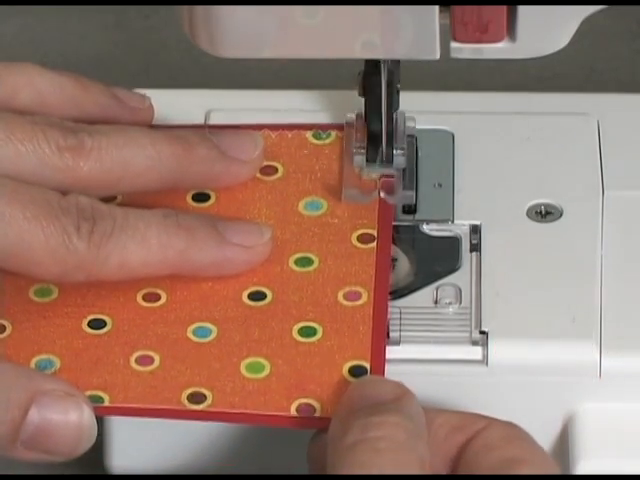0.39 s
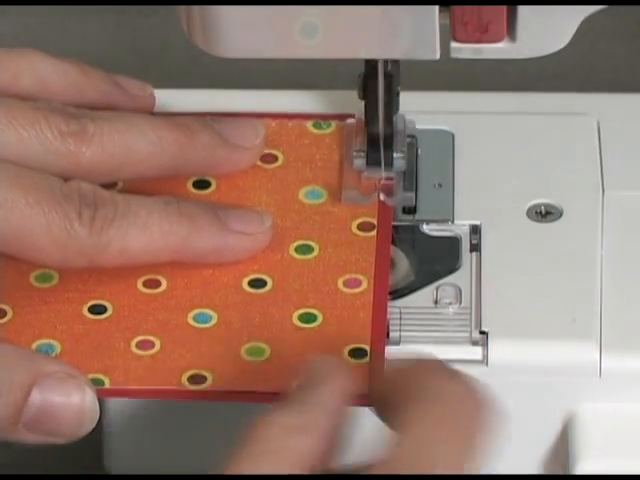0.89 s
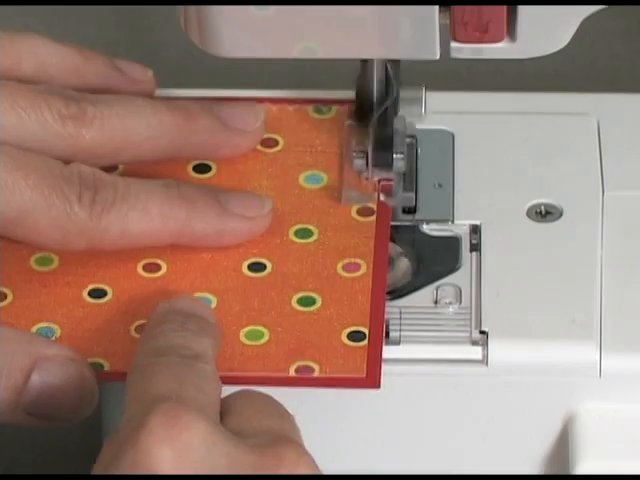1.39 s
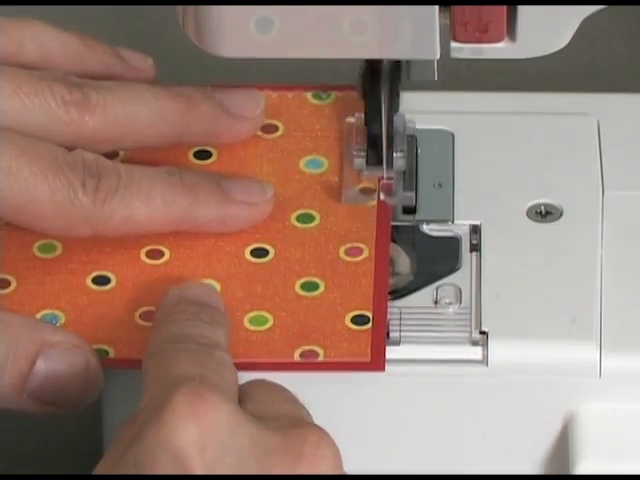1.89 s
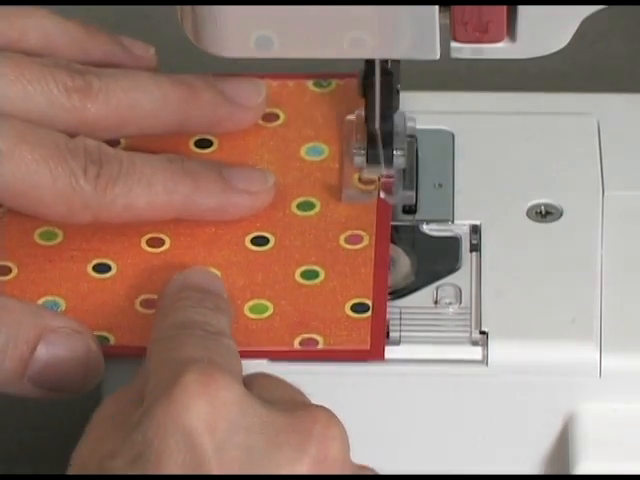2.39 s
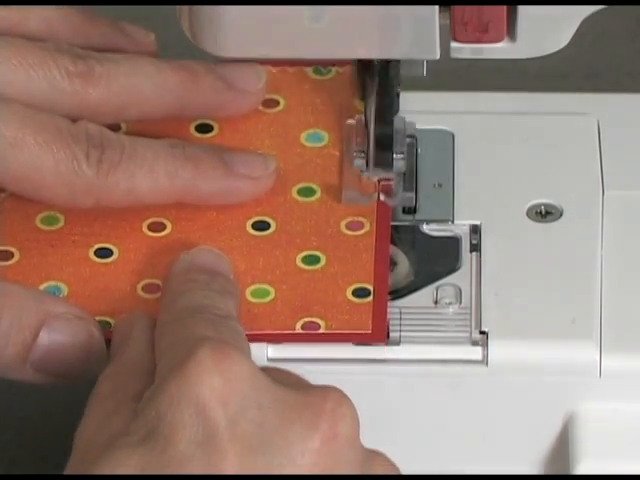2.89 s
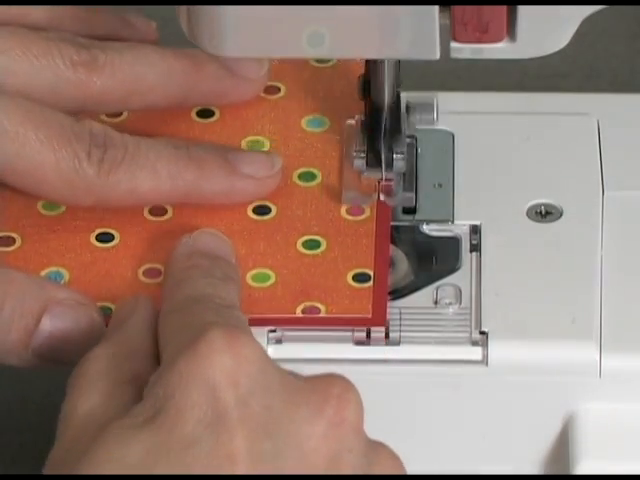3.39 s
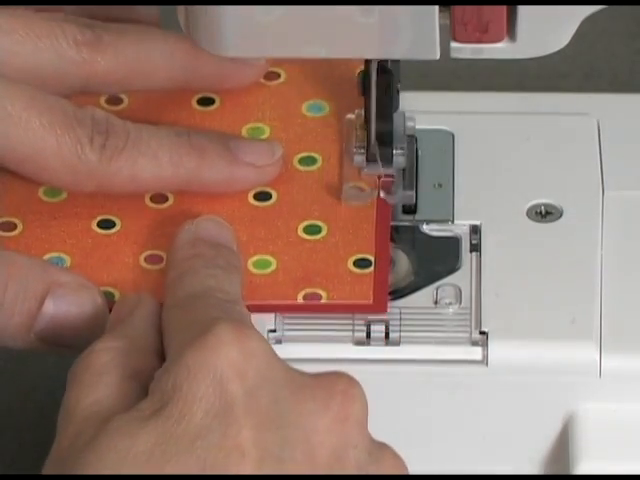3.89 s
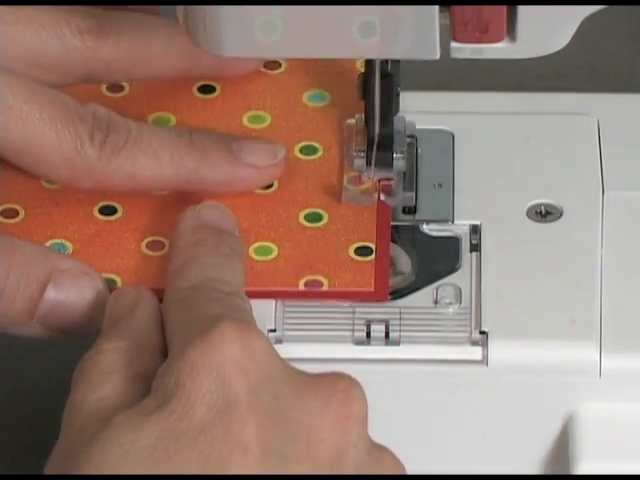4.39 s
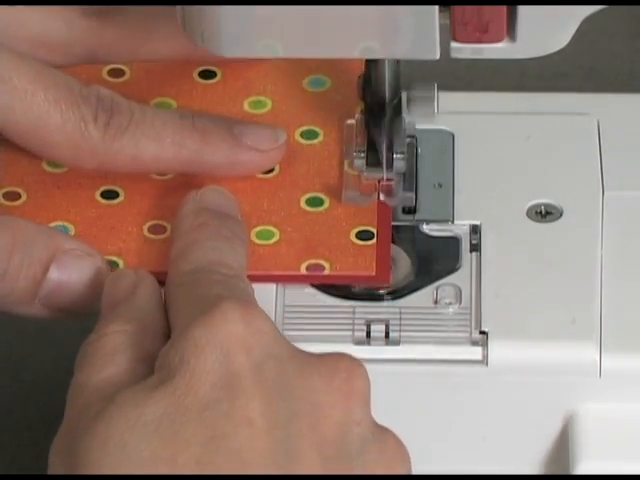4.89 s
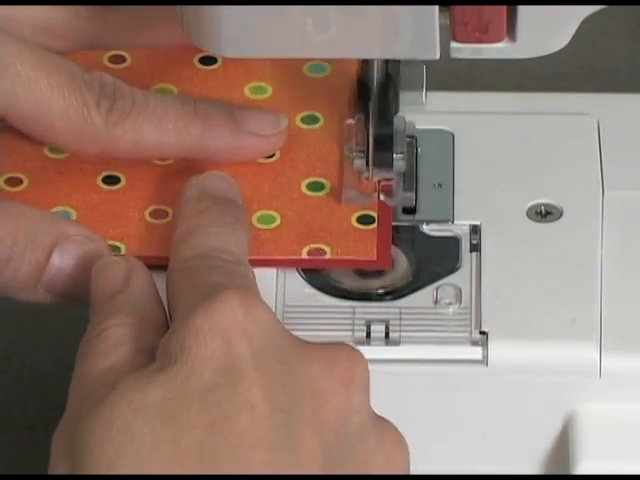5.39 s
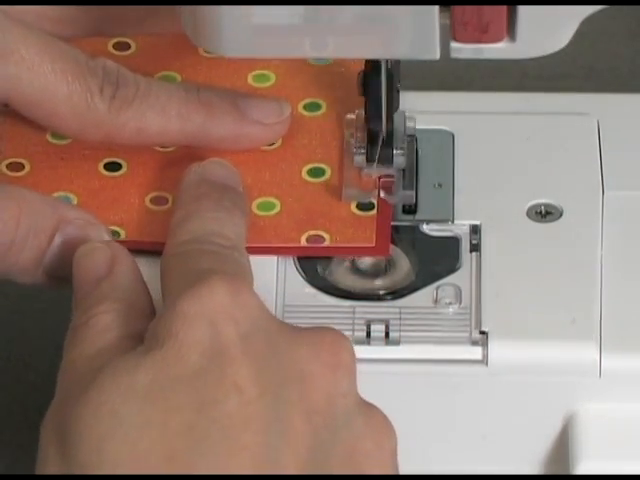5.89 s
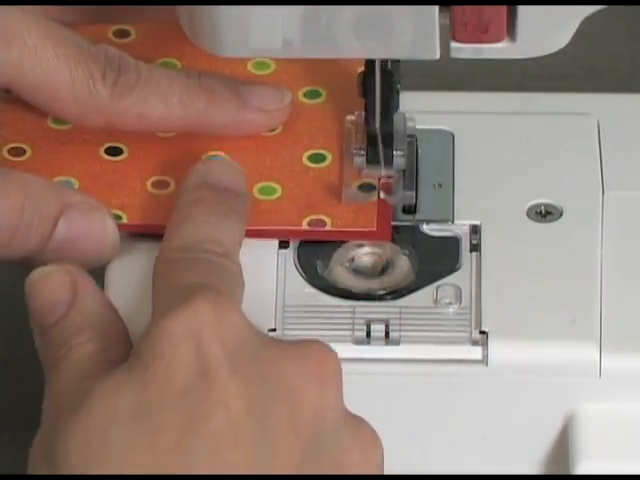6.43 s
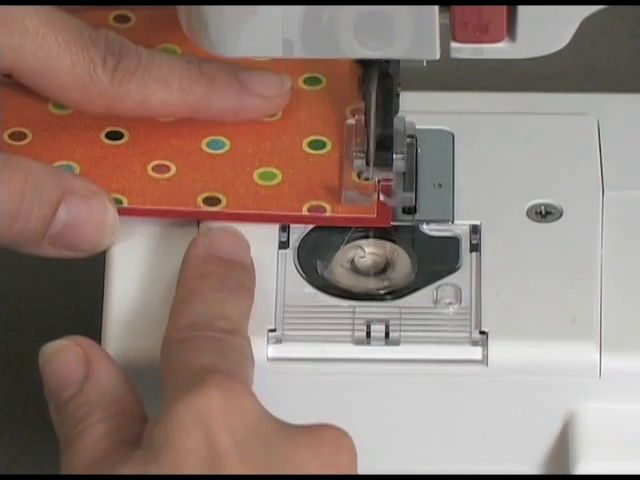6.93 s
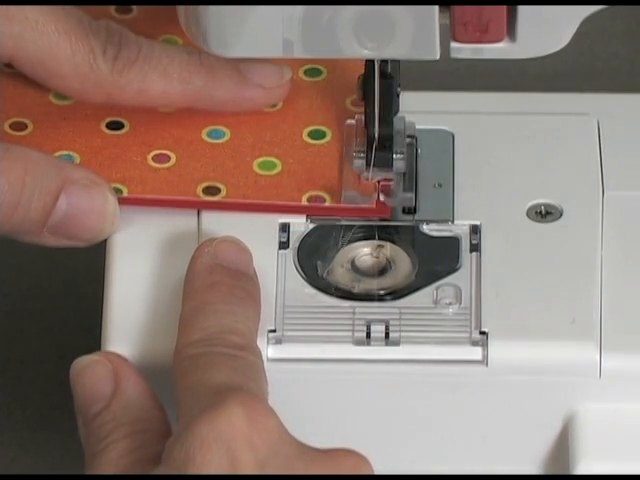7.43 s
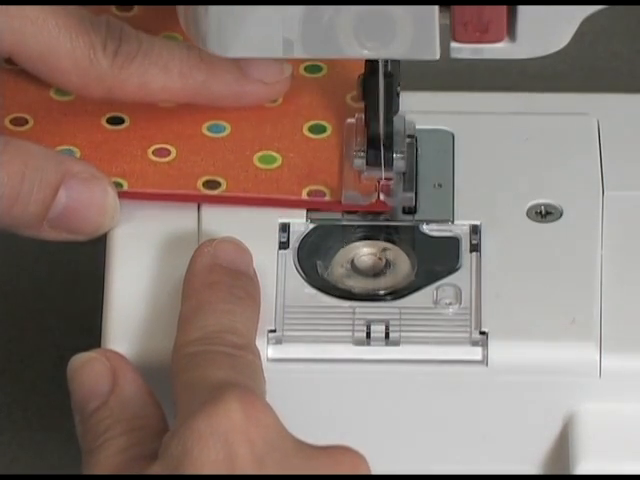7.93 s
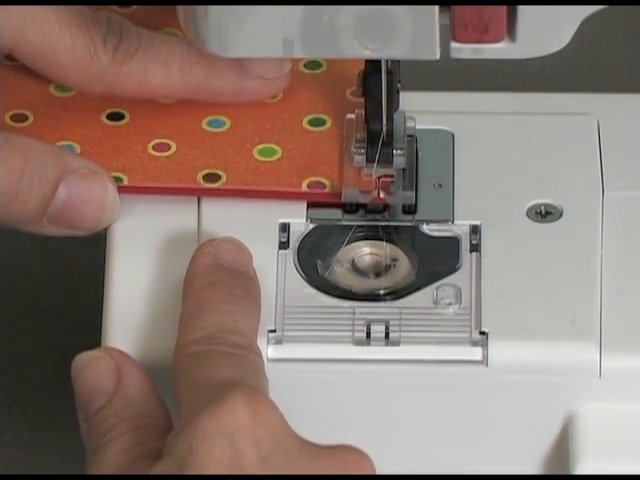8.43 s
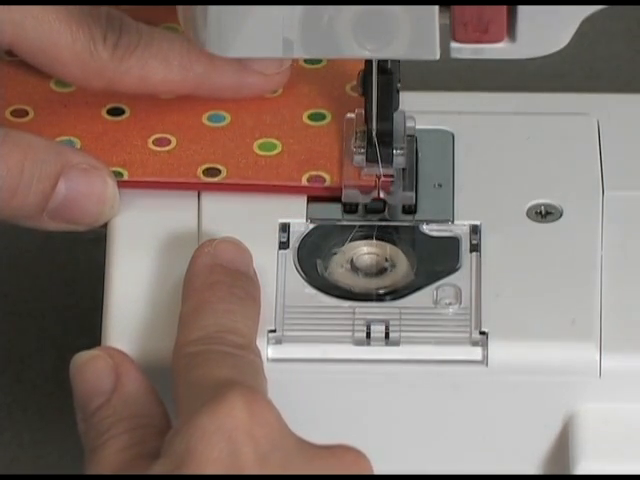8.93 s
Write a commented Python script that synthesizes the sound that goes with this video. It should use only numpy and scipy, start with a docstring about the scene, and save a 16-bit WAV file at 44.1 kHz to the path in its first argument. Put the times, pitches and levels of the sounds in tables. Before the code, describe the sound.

A small sewing machine on a table stitches through card at an unhurried, even pace, heard close in a small room. Uneven metallic clacks, light table thumps and loose-part rattles ride on a humming, whirring drive whose pitch wavers each turn. It runs down with a knock, leaving a faint low room hum, then the motor gives two short bursts, the second briefer, and goes quiet.

```python
"""Small sewing machine on a table

It stitches a zigzag through card, stops, and gives two short bursts in a faintly humming room.
One cam turn covers two stitches: blows at fixed shaft angles ring table, frame, shell and steel parts.
A toothed drive hums on the shaft angle; gears whir as noise gated by the tooth mesh."""
import sys
import numpy as np
from scipy import signal
from scipy.fft import rfft, irfft, next_fast_len
from scipy.io import wavfile
from scipy.ndimage import uniform_filter1d

SR = 44100
rng = np.random.default_rng(int(sys.argv[2]) if len(sys.argv) > 2 else 0)


def generate_wav(sig):
    """Save sig (samples, or channels by samples) to the path in sys.argv[1] as 16-bit PCM at SR."""
    pcm = np.round(np.clip(np.atleast_2d(sig).T, -1, 1) * 32767).astype(np.int16)
    wavfile.write(sys.argv[1], SR, pcm)


def undo_db(level):
    """Turn decibels back into plain size, where 20 dB means ten times bigger."""
    steps = np.asarray(level, float) / 20
    return 10 ** steps


N = 399105
DRIVE_TEETH = 83

# low modes of the table: mode_hz, level_db, t60_s
TABLE_MODES = [(48.7, -25.5, 0.083), (70, -13, .09), (89, -8.5, 0.23), (126, -2, 0.094), (133.7, -5, 0.18)]
# low modes of the frame: mode_hz, level_db, t60_s
FRAME_MODES = [(196, -23.5, 0.13), (255.8, 3.5, 0.23), (300, 4.5, 0.073), (325.5, 2, 0.11),
               (407.5, 1, 0.087)]
# ringing bands, shell then four of steel:
# low_hz, high_hz, rattle_t60_s, tail_db, whir_db, share repeating each turn (0-1)
RING_BANDS = [(418, 2930, 0.043, -11, -0.74, 0.55), (2200, 4100, 0.026, -10, -17, 0.02),
              (4090, 6900, 0.021, -15.5, -16, 0), (6550, 8700, 0.023, -18.5, -32.5, 0.07),
              (9000, 18000, 0.02, -16.5, -27, .05)]


def evened(x):
    """Scales to rms 1."""
    return x / np.sqrt(np.mean(x ** 2) + 1e-20)


def read(points, hz):
    """Reads a spectrum on a log-frequency axis."""
    f, value = np.transpose(points)
    return np.interp(np.log(hz + 1), np.log(f + 1), value)


def shaped(x, gain):
    """Filters by a gain given as a function of frequency."""
    size = next_fast_len(N + 4096)
    bins_hz = np.arange(size // 2 + 1) * SR / size
    return irfft(rfft(x, size) * gain(bins_hz), size)[:N]


def ring(train, modes, rise_s=1e-5):
    """Every click starts the same dying sines."""
    t = np.arange(SR // 3) / SR
    sound = sum(undo_db(db - 60 * t / t60_s) * np.sin(2 * np.pi * hz * t) for hz, db, t60_s in modes)
    return signal.oaconvolve(train, sound * (1 - np.exp(-t / rise_s)))[:N]


def strike(angle, at, level_db, soft_db):
    """Click trains, one per column of level_db: a click where the shaft passes an angle."""
    heard = (at > angle[0]) & (at < angle[-1])
    where = np.searchsorted(angle, at[heard])
    trains = np.zeros((level_db.shape[-1], N))
    np.add.at(trains.T, where, undo_db(level_db[heard] + soft_db[where][:, None]))
    return trains


def motion():
    """Shaft angle in turns, and drive level in dB below full as the pedal switches power."""
    # cam position, even running, coasting, rest and two more starts: time_s, angle_turns
    shaft = [(-0.0874, 0), (1.022, 3), (2.1358, 6), (3.6103, 10), (4.7122, 13), (6.1777, 17), (7.27, 20),
             (7.303, 20.08), (7.354, 20.165), (7.381, 20.195), (7.5, 20.27), (7.69, 20.27), (7.78, 20.34),
             (7.848, 20.463), (7.95, 20.698), (8.049, 20.957), (8.096, 21.08), (8.132, 21.165),
             (8.152, 21.195), (8.3, 21.3), (8.585, 21.3), (8.666, 21.44), (8.708, 21.51), (8.745, 21.578),
             (8.835, 21.78), (8.873, 21.83), (8.961, 21.9), (9.06, 21.93)]
    # pedal presses: power_on_s, full_drive_s, power_off_s, gears_halt_s
    runs = [(-0.6, -0.3, 7.292, 7.42), (7.694, 7.856, 8.1, 8.245), (8.578, 8.72, 8.76, 8.972)]
    kick_db, kick_s = -11, 0.019  # the motor jumps to this level on power
    coast_db_per_s, halt_db_per_s = 89, 198
    t = np.arange(N) / SR
    levels_db = []
    for on, full, off, halt in runs:
        start_db = np.interp(t, [on, on + kick_s, max(full, on + 2 * kick_s)], [-60, kick_db, 0])
        coast_db = coast_db_per_s * np.clip(t - off, 0, halt - off)
        halt_db = halt_db_per_s * np.maximum(t - halt, 0)
        levels_db.append(start_db - coast_db - halt_db)
    return np.interp(t, *np.transpose(shaft)), np.max(levels_db, axis=0)


def room():
    """Shaped air noise and a few steady tones."""
    # spectrum of the air noise, relative: freq_hz, level_db_per_hz
    air_spectrum = [(18, -30), (30, 1), (96, 12), (142, -1), (257, 2.5), (392, -17), (514, -11.5),
                    (642, -20.5), (1490, -19), (2690, -31.5), (11000, -39.5), (14300, -72), (22000, -120)]
    air_rms_db = -42.5
    # steady tones: pitch_hz, rms_db
    tones = [(258.4, -54), (7940, -87), (11843, -71)]
    t = np.arange(N) / SR
    air = evened(shaped(rng.standard_normal(N), lambda hz: undo_db(read(air_spectrum, hz))))
    out = undo_db(air_rms_db) * air
    for hz, db in tones:
        out += np.sqrt(2) * undo_db(db) * np.sin(2 * np.pi * (hz * t + rng.random()))
    return out


def walls(x):
    """Sparse reflections of random sign, each band dying at its own speed."""
    # reverberation: freq_hz, t60_s
    decay_times = [(200, 0.5), (1000, 0.3), (4000, 0.12), (12000, 0.23)]
    level_db = -11.5
    taps = np.zeros(SR // 2)
    at = np.arange(300, len(taps) - 20, 20)
    taps[at + rng.integers(0, 20, len(at))] = rng.choice([-1., 1.], len(at))
    hz, t, z = signal.stft(taps, SR, nperseg=256)
    decay = undo_db(-60 * t / read(decay_times, hz)[:, None])
    tail = signal.istft(z * decay, SR, nperseg=256)[1]
    return undo_db(level_db) * signal.oaconvolve(x, tail / np.linalg.norm(tail))[:N]


def gear_rumble(whir_db):
    """The whir also shakes the low modes."""
    push = undo_db(whir_db - 36.5) * rng.standard_normal(N)
    return ring(push, FRAME_MODES) + undo_db(-15) * ring(push, TABLE_MODES)


def whistles(angle, drive_db):
    """A part slides on each stroke: narrow noise rides a gliding tone, fading in and out."""
    # thin whistles: from_turns, to_turns, start_hz, end_hz, level_db
    strokes = [(.17, .46, 11400, 11600, -55), (.5, .9, 10800, 10720, -54)]
    width_hz = 45
    out, r = np.zeros(N), np.exp(-np.pi * width_hz / SR)
    for start, end, start_hz, end_hz, db in strokes:
        along = np.clip((angle % 1 - start) / (end - start), 0, 1)
        fuzz = evened(signal.lfilter([1 - r], [1, -r], rng.standard_normal(N)))
        phase = 2 * np.pi * np.cumsum(start_hz + (end_hz - start_hz) * along) / SR
        fade = np.sqrt(2 * abs(np.sin(np.pi * along)))
        out += fade * undo_db(db + drive_db) * fuzz * np.sin(phase)
    return out


def hum(angle, drive_db):
    """Tooth after tooth: a clean tone that sags and swells with the load."""
    # load swing within a turn: angle_turns, hum_db, speed_change_percent
    load = [(0.0, 0.1, 0.7), (.031, -1, -1.13), (.075, 3.1, 0.3), (.13, 2.4, -3), (.19, 0.7, -1.85),
            (.225, -2.5, -3), (.34, -0.3, -0.16), (.375, -2, -1.36), (.445, 3.7, 1.5), (.5, 0.9, -1.81),
            (.56, 1.8, 1.3), (.625, -2.5, 2.5), (.69, 0.2, 0.77), (.75, 1.8, 2.5), (.82, -2.1, .4),
            (.88, 1.9, 1.67), (.94, 0, -1.63)]
    # overtones: multiple, level_db
    overtones = [(2, -21), (3, -18.5), (4, -40), (5, -31.5), (6, -24), (7, -21.5), (8, -35.5)]
    full_db, steepness = -15, 2.6  # the hum drops faster than the whir
    mute_hz = 193  # the frame is mute below its first resonance
    at, *swings = np.transpose(load)
    speed = uniform_filter1d(np.gradient(angle) * SR, size=SR // 25)
    load_db, percent = (uniform_filter1d(np.interp(angle, at, c, period=1), size=200) for c in swings)
    hz = DRIVE_TEETH * speed * (1 + percent / 100)
    phase = 2 * np.pi * np.cumsum(hz) / SR
    tone = np.sin(phase) + sum(undo_db(db) * np.sin(round(k) * phase) for k, db in overtones)
    radiated = 1 / np.sqrt(1 + (mute_hz / (hz + 1)) ** 16)
    return np.sqrt(2) * undo_db(full_db + steepness * drive_db + load_db) * radiated * tone


def blows(angle, soft_db):
    """Click trains for table, frame, shell and four steel bands, set by cam angle and drive slack."""
    # blows of one turn: angle_turns, frame_db, shell_db, steel_db, brightness_db_per_band
    cam = [(0.016, -26.5, -14.5, -38, -6), (0.074, -33, -15, -27.5, 3.5), (0.11, -31, -26.5, -44, -2),
           (0.161, -26, -16, -23, 0), (0.189, -22.5, -19.5, -28, -3.7), (0.229, -33.5, -26, -40.5, 7),
           (0.283, -40.5, -23, -31.5, 4.5), (0.335, -33.5, -23, -36.5, 3.5), (0.357, -30.5, -24, -29, 0),
           (0.411, -32.5, -28.5, -40.5, 3), (0.437, -36, -19.5, -40, 3), (0.46, -22.5, -14, -23.5, -.6),
           (0.485, -20, -19, -34.5, -.8), (0.504, -26, -11.5, -20.5, 0), (0.572, -24.5, -14.5, -30.5, 4),
           (0.649, -42, -15.5, -36.5, 2.5), (0.671, -42.5, -19.5, -33, -3.5),
           (0.73, -30, -20.5, -34.5, -1.1), (0.778, -38, -27, -33.5, 4.5), (0.831, -24.5, -19, -34.5, 2),
           (0.865, -44.5, -20, -29.5, 1), (0.9, -31, -19.5, -35.5, 1.5), (0.952, -21, -12, -16.5, 0),
           (0.981, -19.5, -15, -24.5, 1), (0.996, -44, -5, -15, 1.4)]
    # the mechanism's weight pushes the table: angle_turns, level_db
    thuds = [(0.11, -23), (0.227, -31), (0.283, -37.5), (0.504, -26.5), (0.65, -33), (0.73, -36),
             (0.778, -32), (0.952, -23), (0.997, -19.5)]
    # slack in the drive knocks as it stops and starts: time_s, table_db, shell_db, steel_db
    knocks = [(7.272, -30, -7.5, -22), (7.704, -45, -32.5, -51), (8.591, -48, -31, -50),
              (8.616, -40, -21, -49), (8.682, -20, -14, -16.5), (8.96, -41, -37, -45)]
    # answer of the four steel bands, low to high: level_db
    steel_answer = [-1.06, 0.3, -7, -14]
    scatter_db, steel_scatter_db = 1.87, 1.95  # loose steel takes each blow differently
    turns = np.arange(int(angle[-1]) + 1)

    at, frame_db, shell_db, steel_db, bright_db = np.transpose(cam)
    steel_db = steel_db[:, None] + steel_answer + np.outer(bright_db, np.arange(4) - 3 / 2)
    chance = rng.standard_normal((len(at), len(turns), 7))
    chance[..., 0] *= .3  # the heavy frame repeats closely
    level_db = np.column_stack([frame_db, shell_db, steel_db])[:, None] + scatter_db * chance[..., :6]
    level_db[..., 2:] += steel_scatter_db * chance[..., 6:]
    parts = strike(angle, np.add.outer(at, turns), level_db, soft_db)

    at, thud_db = np.transpose(thuds)
    thud_db = np.add.outer(thud_db, 0 * turns)[..., None]
    table = strike(angle, np.add.outer(at, turns), thud_db, soft_db)

    for s, table_db, shell_db, steel_db in knocks:
        table[0, round(s * SR)] += undo_db(table_db)
        parts[1:, round(s * SR)] += undo_db([shell_db, *np.add(steel_db, steel_answer)])
    return np.vstack([table, parts])


def pings(trains, whir_db):
    """Each blow strikes the steel parts unevenly and bounces once; loose parts chatter by chance."""
    # small steel parts: pitch_hz, level_db, t60_s
    metal = [(3150, -34, 0.04), (3860, -6, 0.035), (4470, -2, 0.018), (4970, -3.5, 0.022),
             (5290, -18, 0.0089), (7080, -3, 0.024), (7290, 0.5, 0.014), (7850, -0.5, 0.018),
             (9180, -3.5, 0.023), (11100, -4.5, 0.018)]
    # loose parts that chatter between the blows: pitch_hz
    loose = [4950, 5100, 5220, 5460]
    loose_per_s, loose_db = 29, -14.5  # for each loose part
    out = np.zeros(N)
    for hz, db, t60_s in metal:
        train = trains[np.searchsorted([hi for lo, hi, *rest in RING_BANDS[1:]], hz)]
        bounce = undo_db(-5.5) * np.roll(train, round(rng.uniform(.0015, 0.0035) * SR))
        uneven = undo_db(4.6 * rng.standard_normal(N))
        out += ring((train + bounce) * uneven, [(hz, db, t60_s)], rise_s=.0003)
    shake_db = whir_db + np.minimum(whir_db + 30, 0)  # a slow shaft hardly shakes them
    for hz in loose:
        size = undo_db(shake_db + loose_db + 3.6 * np.minimum(rng.exponential(1, N), 4))
        hits = rng.random(N) < loose_per_s / SR
        out += ring(size * hits, [(hz, 0, .02)], rise_s=0.00025)
    return out


def band(lo_hz, hi_hz):
    """One slice of the machine's colour, of unit power."""
    # shell and microphone: freq_hz, level_db_per_hz
    colour = [(150, -20.5), (250, -6), (277, 9), (307, -6.5), (625, -10.5), (909, -7), (1150, -14),
              (1300, -14.5), (1670, -16.5), (2230, -24), (4960, -31.5), (11200, -42), (13000, -47.5),
              (14500, -51.5)]
    # resonances above (or dips below) that colour: freq_hz, width_hz, level_db
    resonances = [(376, 58, 4.5), (705, 30, 4), (923, 210, 2.5), (1005, 44, 1.5), (1304, 76, 7.5),
                  (1453, 28, 6), (1706, 90, 4), (3280, 210, 3.5), (4530, 63, -7), (5030, 620, 1.5),
                  (7140, 180, -4), (7700, 200, -1.5), (9070, 160, 2), (1897, 140, 3.5)]

    def gain(hz):
        peaks_db = sum(db / (1 + (2 * (hz - f) / w) ** 2) for f, w, db in resonances)
        edges = (1 + (lo_hz / (hz + 1)) ** 8) * (1 + (hz / hi_hz) ** 8)
        return evened(undo_db(read(colour, hz) + peaks_db) / np.sqrt(edges))
    return gain


def rattle(angle, trains, whir_db):
    """Blows and meshing teeth gate a rough contact force that rings the shell and metal parts."""
    chatter_db, tail_t60_s = 1.5, 0.17  # uneven mesh; parts settling after a blow
    t, out = np.arange(SR // 3) / SR, np.zeros(N)
    wear = rng.standard_normal(16384)
    worn = wear[(angle % 1 * len(wear)).astype(int)]  # the same surfaces meet again each turn
    mesh = evened(1 + .22 * np.cos(2 * np.pi * DRIVE_TEETH * angle))
    chatter = evened(uniform_filter1d(rng.standard_normal(N), size=250))
    mesh *= evened(undo_db(chatter_db * chatter))
    for train, (lo, hi, t60_s, tail_db, own_db, same) in zip(trains, RING_BANDS):
        same = np.clip(same, 0, 1)
        force = np.sqrt(same) * worn + np.sqrt(1 - same) * rng.standard_normal(N)
        attack = (1 - np.exp(-t / 0.0014)) ** 2
        decay = undo_db(-60 * t / t60_s) * attack + undo_db(tail_db - 60 * t / tail_t60_s)
        blow_power = signal.oaconvolve(train ** 2, decay ** 2)[:N]
        # slow gears sound duller
        dull_db = 0.1 * np.log2(hi / 2200) * np.maximum(-15.5 - whir_db, 0)
        whir_power = (undo_db(own_db + whir_db - dull_db) * mesh) ** 2
        out += shaped(force * np.sqrt(abs(blow_power + whir_power)), band(lo, hi))
    return out


def scene():
    """The machine in its room."""
    angle, drive_db = motion()
    whir_db = -20 + drive_db
    soft_db = 1.32 * np.minimum(drive_db + 3, 0)  # a slow shaft strikes softly
    trains = blows(angle, soft_db)
    thumps = ring(trains[0], TABLE_MODES) + ring(trains[1], FRAME_MODES)
    clatter = rattle(angle, trains[2:], whir_db) + pings(trains[3:], whir_db) + whistles(angle, drive_db)
    clatter += walls(clatter)
    return (thumps + clatter + gear_rumble(whir_db) + hum(angle, drive_db) + room())[None]


def roll_off(x):
    """The treble ends steeply here."""
    return signal.sosfilt(signal.butter(12, 14620, fs=SR, output="sos"), x)


def record(dry):
    """The microphone drops the deepest bass; peaks beyond full scale clip."""
    thin = signal.sosfilt(signal.butter(4, 48, "high", fs=SR, output="sos"), dry)
    return roll_off(np.clip(thin, -1, 1))


dry = scene()
out = record(dry)
generate_wav(out)
```